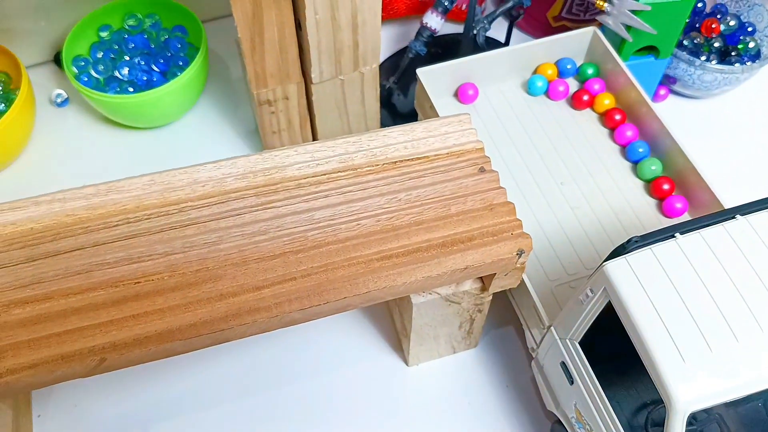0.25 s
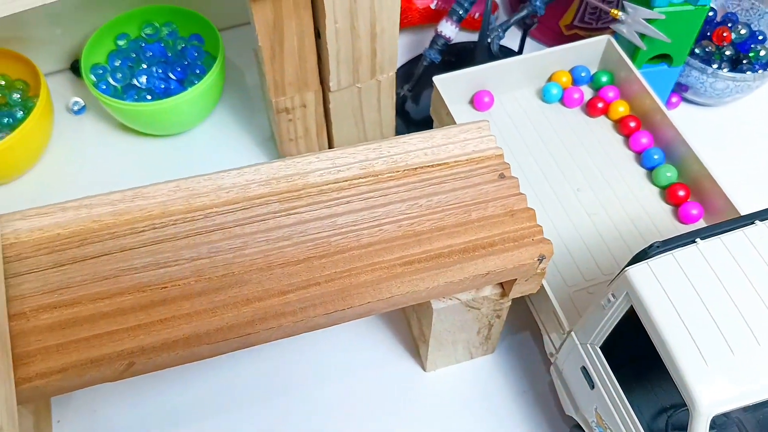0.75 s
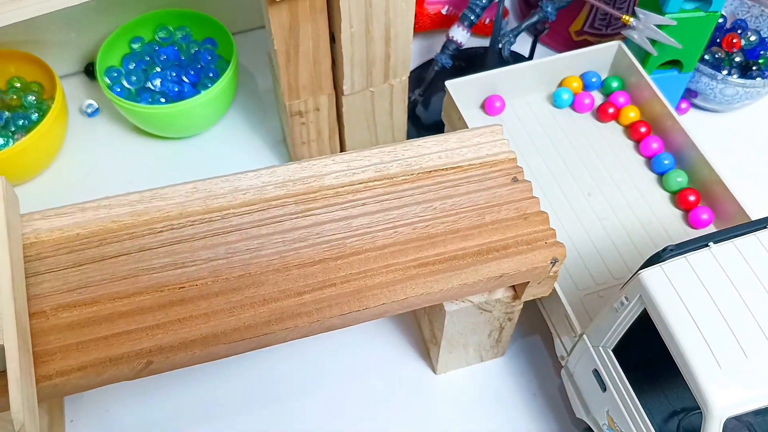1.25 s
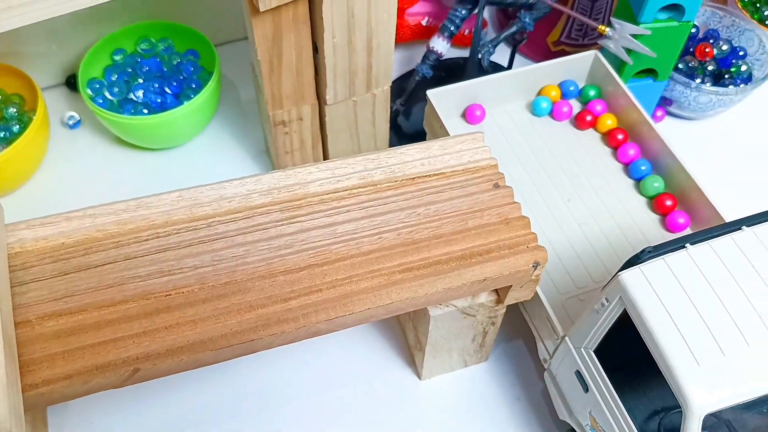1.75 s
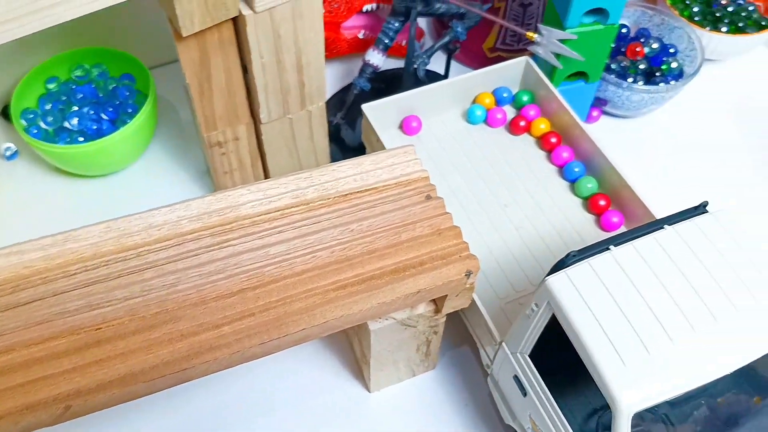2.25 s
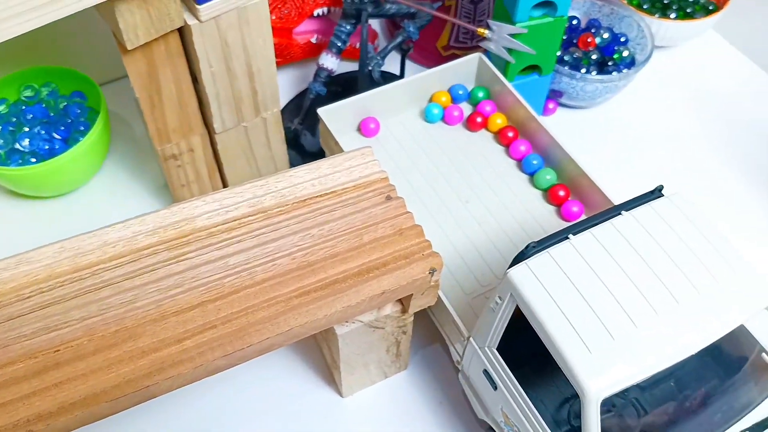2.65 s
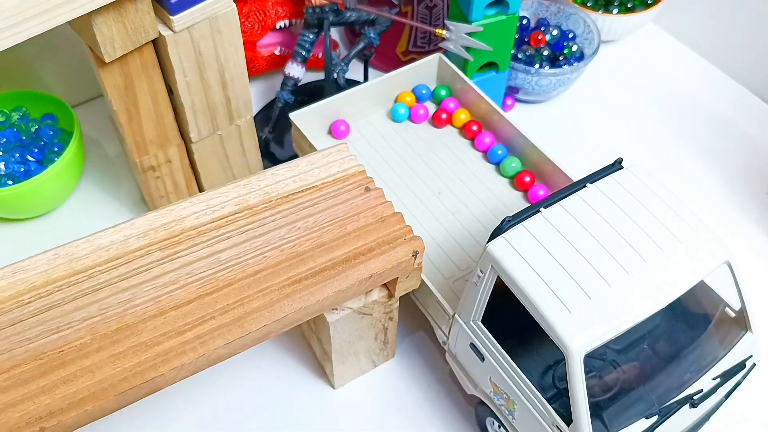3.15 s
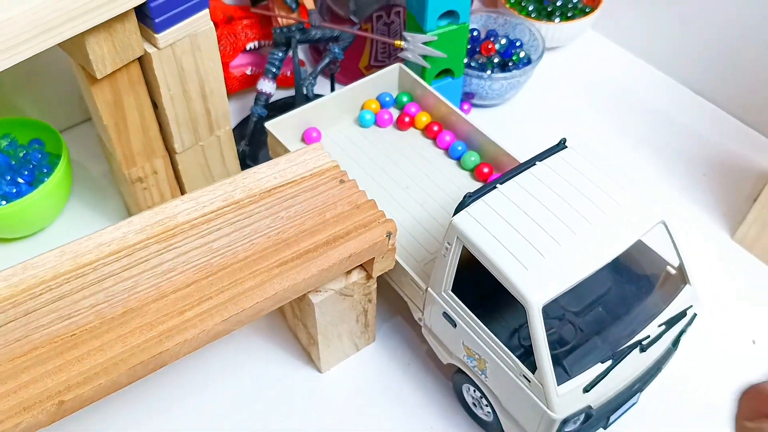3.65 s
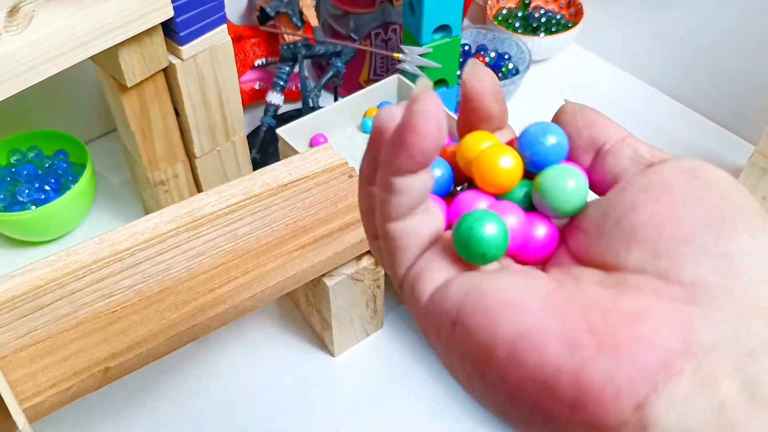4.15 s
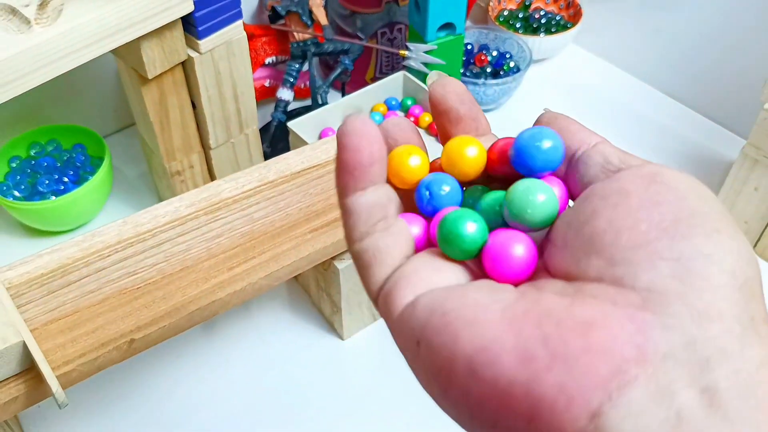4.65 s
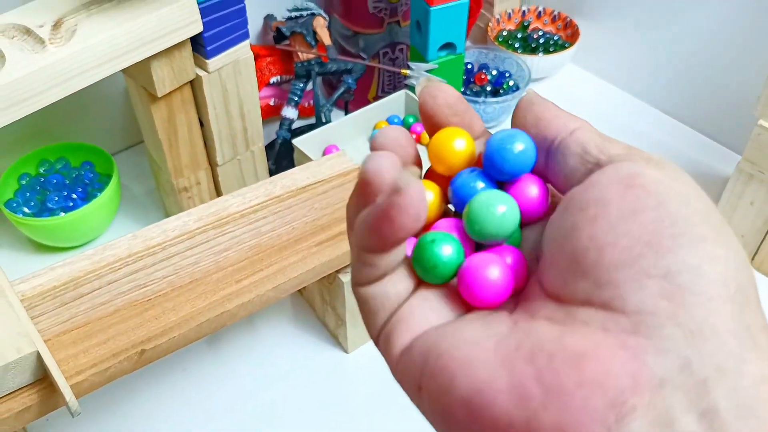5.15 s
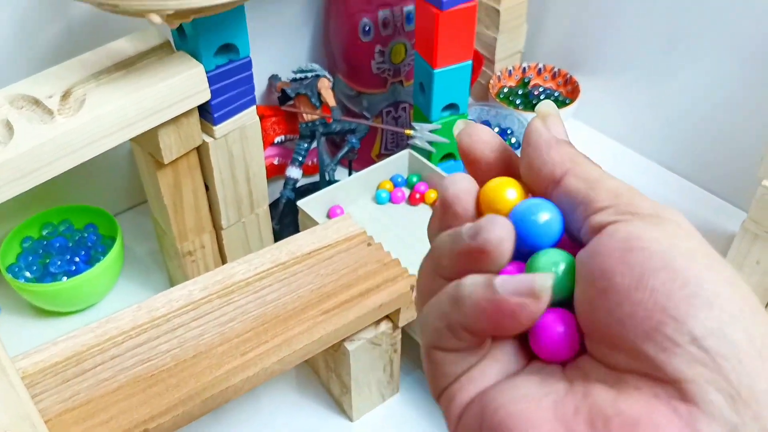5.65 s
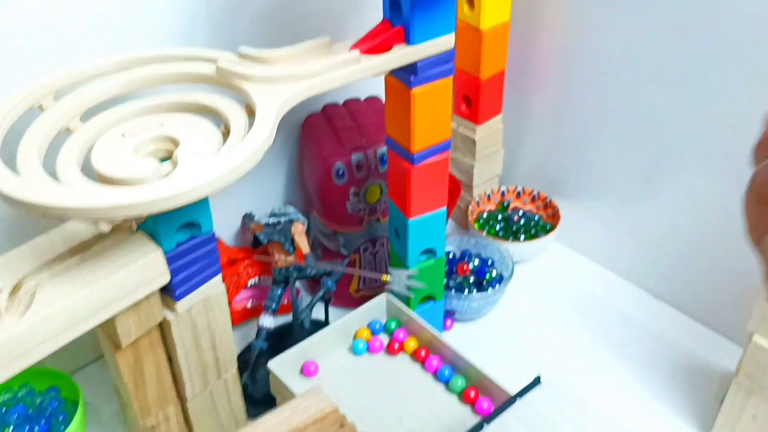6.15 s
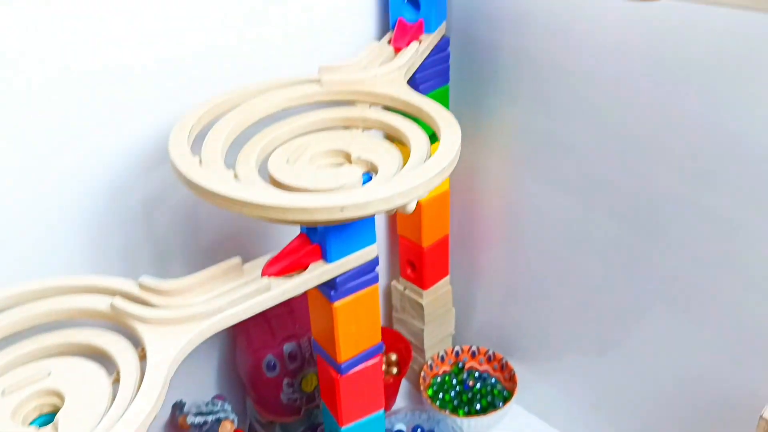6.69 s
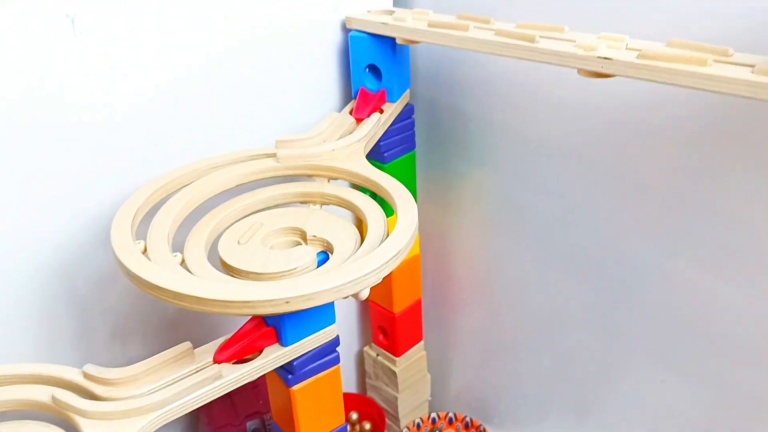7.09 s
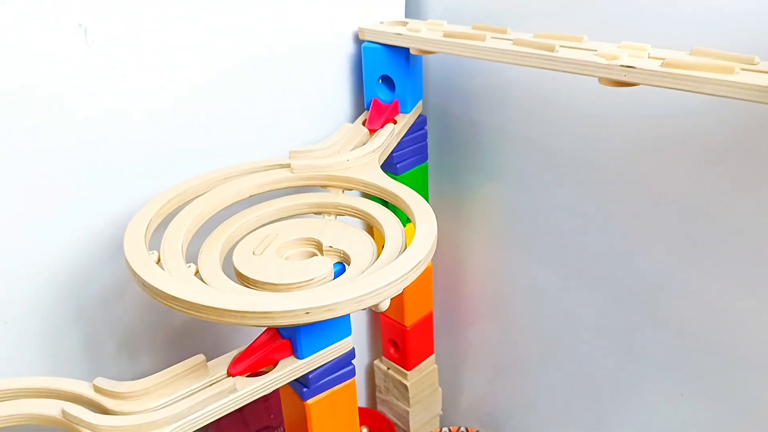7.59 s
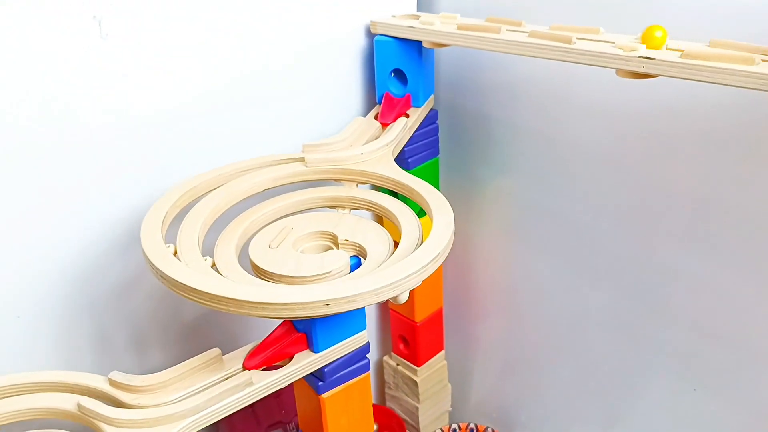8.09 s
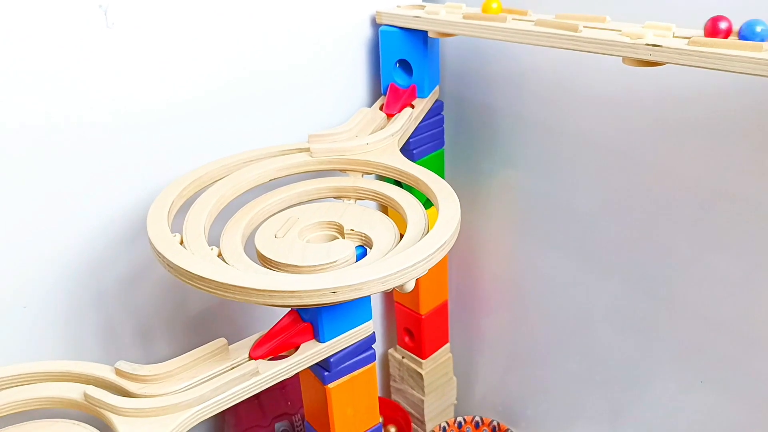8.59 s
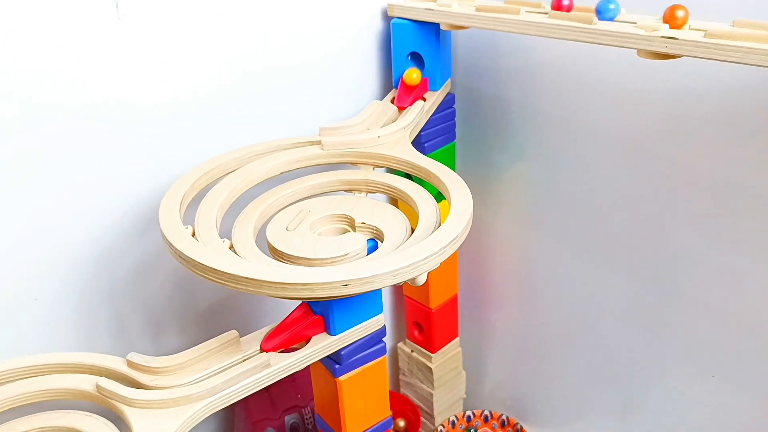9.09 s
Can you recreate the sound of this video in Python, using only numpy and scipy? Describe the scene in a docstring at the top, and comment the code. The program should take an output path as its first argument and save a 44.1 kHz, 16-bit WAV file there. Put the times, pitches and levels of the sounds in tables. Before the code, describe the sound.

Hard little balls rattle in a tub, two loud knocks ring out, soft palm clicks follow, then wooden clacks and rolling in a bare room.

```python
"""A hand stirs and scoops small hard balls in a plastic tub: short noise cracks and brief modal notes.
Two hollow knocks, on the tub and then a board, rebound and rattle: each object has its own damped modes.
The balls click in the palm on the way to a wooden marble run: bright cracks and a lower note of the cupped hand.
They drop one by one on its top rail, as clacks and panel thumps, and roll: dense tiny contacts over a rumble.
A bare room rings by decaying noise; filtered noise makes faint air and a low wavering hum underneath."""
import sys
import numpy as np
from scipy import signal
from scipy.fft import rfft, irfft, next_fast_len
from scipy.io import wavfile

SR = 44100
rng = np.random.default_rng(int(sys.argv[2]) if len(sys.argv) > 2 else 0)


def output_pcm(signal):
    """Save a mono or channel-first signal as 16-bit PCM at the path in sys.argv[1].

    Samples are clipped to [-1, 1] before scaling.
    """
    pcm = np.clip(np.atleast_2d(signal).T, -1, 1) * 32767
    wavfile.write(sys.argv[1], SR, np.round(pcm).astype(np.int16))


N = 411453
T = np.arange(N) / SR


def undb(db):
    """Logarithmic level: decibels to amplitude gain."""
    return 10 ** (np.asarray(db) / 20)


def lookup(points, hz):
    """Logarithmic pitch scale: interpolate (frequency_hz, value) points over log frequency."""
    f, value = np.transpose(points)
    return np.interp(np.log(np.maximum(hz, 1)), np.log(f), value)


def fade(t, t60):
    """Exponential damping: amplitude is 60 dB down at t60 seconds."""
    return np.exp(-np.log(1000) * t / t60)


def sides(db):
    """Level-difference stereo: left and right gains for left minus right in dB."""
    return undb(np.array([[db], [-db]]) / 2)


def tint(x, colour, shift=1, size=1024):
    """Minimum-phase filtering: a causal response of unit energy, its colour moved up in pitch by shift."""
    hz = np.arange(size // 2 + 1) * SR / size
    cepstrum = irfft(np.log(undb(lookup(colour, hz / shift))))
    # folding the cepstrum onto positive time makes the response causal
    cepstrum[1:size // 2] *= 2
    cepstrum[size // 2 + 1:] = 0
    h = irfft(np.exp(rfft(cepstrum)))
    return signal.fftconvolve(x, h[None] / np.linalg.norm(h), axes=1)[:, :x.shape[1]]


def ports(count, alike_hz=650):
    """Spatial coherence: noise at two microphones, alike in the bass and unrelated in the treble."""
    mid, side = rfft(rng.standard_normal((2, count)))
    hz = np.arange(len(mid)) * SR / count
    alike = 1 / (1 + (hz / alike_hz) ** 2)
    mid = mid * np.sqrt(1 + alike)
    side = side * np.sqrt(1 - alike)
    return irfft(np.array([mid + side, mid - side]), count) / np.sqrt(2)


def add(out, s, sound):
    """Superposition: mix a sound in at time s."""
    i = max(int(s * SR), 0)
    out[:, i:i + sound.shape[1]] += sound[:, :N - i]


def contact(colour, crack_s, echo_s, echo_db, rise_s=0.0041, shift=1, vary_db=7.0, size=4096, count=176):
    """Impulsive excitation: a crack of unit level over count samples, with sparse echoes off nearby things."""
    t = np.arange(size) / SR
    # no two contacts ring alike
    colour = np.array(colour) + np.array([0, vary_db]) * rng.standard_normal((len(colour), 1))
    crack = ports(size) * fade(t, crack_s) * (1 - fade(t, rise_s))
    polarity = rng.choice([-1, 0, 1], (2, size), p=[.06, .88, .06])  # most samples carry no echo
    arrivals = rng.standard_normal((2, size)) ** 2 * polarity
    echoes = arrivals * fade(t, echo_s) * (1 - fade(t, 0.032))
    crack, echoes = (tint(v, colour, shift) for v in (crack, echoes))
    crack, echoes = (v / np.linalg.norm(v, axis=1, keepdims=True) for v in (crack, echoes))
    return (crack + undb(echo_db) * echoes) * np.sqrt(count)


def ring(modes, spread_db=6.5, detune=0.0036, size=22050):
    """Modal superposition: damped sinusoids, weighted anew because each blow lands elsewhere."""
    hz, db, t60 = np.transpose(modes)[:, :, None]
    t = np.arange(size) / SR
    weight, tuning, lag = rng.standard_normal((3, len(hz), 1))
    envelope = undb(db + spread_db * weight) * fade(t, t60) * (1 - np.exp(-t * hz))
    waves = envelope * np.exp(2j * np.pi * hz * (1 + detune * tuning) * t)
    turn = np.exp(1j * lag * hz / 1200)  # short waves reach the two microphones out of step
    polarity = rng.choice([-1, 1], (len(hz), 1))
    return np.array([(waves * polarity * p).imag.sum(0) for p in (turn, turn.conj())])


def note(hz, t60):
    """Local resonance: a close pair of short-lived modes gives one contact its pitch."""
    return ring([(hz * .95, -3, t60), (hz, 0, t60)], spread_db=1, size=4096)


# every contact excites its own handful of modes: their decay, and their level relative to the crack
SPOT_T60_S, SPOT_DB = .055, -1.5


def spot(colour, t60=SPOT_T60_S, count=12, size=4096):
    """Selective modal excitation: a few modes drawn where the colour is strong, as loud as a unit crack."""
    grid = np.geomspace(colour[0][0], colour[-1][0], size)
    odds = undb(lookup(colour, grid)) ** 2 * np.sqrt(grid)
    chosen = rng.choice(grid, count, p=odds / odds.sum())
    x = ring([(hz, 0, t60) for hz in chosen], spread_db=2, size=size)
    return x * np.sqrt(2 * .004 * SR / np.sum(x ** 2))


BUMP_RISE_S = .05  # time for the swell to come within 60 dB of complete


def bump(hz, t60, size=11025):
    """Panel resonance: a soft push makes low modes around hz swell and die, at unit level over 20 ms."""
    x = ring([(hz * .8, -9, t60), (hz, 0, t60), (hz * 1.25, -9, t60)], spread_db=1, size=size)
    x = x * (1 - fade(np.arange(size) / SR, BUMP_RISE_S))
    return x * np.sqrt(2 * .02 * SR / np.sum(x ** 2))


def grains(length, colour, rate, spread_db, smear_s, size=1024):
    """Random impact process: tiny uneven decaying cracks, rate a second on average, at unit level."""
    count = max(int(length * SR), size)
    hits = (rng.random(count) < rate / SR) * undb(spread_db * np.clip(rng.standard_normal(count), -2, 2))
    power = signal.fftconvolve(hits ** 2, fade(np.arange(size) / SR, smear_s) ** 2)
    x = tint(ports(len(power)) * np.sqrt(np.abs(power)), colour)
    return x * np.sqrt(2 * count / (np.sum(x ** 2) + 1e-9))


def waver(rate):
    """Slow random modulation: drift through rate random points a second."""
    return np.interp(T * rate, np.arange(N // 1000), rng.standard_normal(N // 1000))


# how the tub and the board differ between left and right, by frequency: frequency_hz, left_minus_right_db
RIGHT_SIDE = [(200, -4), (1000, 0.5), (2300, -4.5), (4300, -7), (7800, -13.5), (10000, 0), (13000, -23.5)]


def aside(x):
    """Frequency-dependent balance: the tub's and the board's sounds lean right, unevenly across the spectrum."""
    size = next_fast_len(N + SR // 10)
    db = lookup(RIGHT_SIDE, np.arange(size // 2 + 1) * SR / size)
    return irfft(rfft(x, size) * undb(np.array([db, -db]) / 2), size)[:, :N]


# colour of the faint air noise: frequency_hz, relative_level_db
AIR = [(25, -18), (90, -7.5), (150, -9), (260, -2.5), (800, -3), (2600, -3), (5000, -19), (9000, -20.5),
       (16000, -32)]
AIR_DB = -62


def background():
    """Filtered noise: faint air, and a narrow low band that wavers as a hum."""
    air = tint(ports(N), AIR, size=4096)
    hum_band = [(60, -59), (80, -12.0), (91, 7.0), (102, -7.5), (125, -48.5), (400, -91.5)]
    hum = tint(ports(N, alike_hz=302.0), hum_band, size=16384)
    return undb(AIR_DB) * air + undb(-73.5 + 3.2 * waver(6.8)) * hum


# colour of ball against ball: frequency_hz, relative_level_db
CLICK = [(1200, -48.5), (4500, -5.5), (6500, -8.5), (7900, 6), (9800, 4.5), (11800, -10), (16000, -21.5)]
# colour of the tub's wall: frequency_hz, relative_level_db
TUB_WALL = [(45, -17.5), (110, -7), (200, -11), (380, -2), (550, -13), (760, 0.5), (950, -8), (1650, 2),
            (2200, -6), (2850, 0), (3700, -12.5), (4500, -12), (9000, -31.5)]
RAP_NOTE_DB, RAP_T60_S = 2.5, .035  # note of the spot struck, relative to the wall level


def collide(out, s, click_db, wall_db, hz):
    """Impact: one ball strikes its neighbours and the wall, which answers with the note of that spot."""
    add(out, s, undb(click_db) * contact(CLICK, crack_s=0.024, echo_s=0.12, echo_db=-0.5, vary_db=2))
    crack = contact(TUB_WALL, crack_s=0.018, echo_s=0.089, echo_db=-1.0, vary_db=2.5)
    add(out, s, undb(wall_db) * (crack / np.sqrt(2) + undb(SPOT_DB) * spot(TUB_WALL)))
    add(out, s, undb(wall_db + RAP_NOTE_DB) * note(hz, RAP_T60_S))


# balls tumbling in the tub: start_s, click_db, wall_db, spot_pitch_hz
TUMBLES = [(0.032, -28, -36, 2900), (0.1052, -38, -35.5, 1460), (0.2223, -36, -34.5, 3030),
           (0.2523, -21, -30, 1490), (0.349, -23, -34, 1480), (0.381, -23.5, -31.5, 4600),
           (0.493, -24, -26.5, 1810), (0.525, -22.5, -19, 2880), (0.565, -24, -28, 4400),
           (0.6012, -19.5, -22.5, 1750), (0.6247, -27.5, -17.5, 1736), (0.6661, -29, -22, 1670),
           (0.7214, -28.5, -29, 2645), (0.755, -31.5, -28.5, 2900), (0.7754, -48, -29, 2770),
           (1.047, -34, -30, 3280), (1.2124, -30.5, -50, 4440), (1.2286, -42, -29.5, 1770),
           (1.378, -26, -37, 4300), (1.412, -30.5, -35, 1460), (1.543, -24.5, -27, 1500),
           (1.5924, -31, -29.5, 1610), (1.665, -39, -23, 1766), (1.715, -36.5, -34, 1140),
           (1.795, -48, -26, 2610), (1.91, -24.5, -26, 3150), (2.1451, -37.5, -46.5, 4430),
           (2.358, -36.5, -49.5, 4460)]


def tumbles():
    """Discrete impacts: single balls click on each other and rap the wall."""
    out = np.zeros((2, N))
    for row in TUMBLES:
        collide(out, *row)
    return out


# balls bumping the tub's bottom, whose note shifts with place and load: start_s, level_db, pitch_hz
BUMPS = [(0.252, -38, 247), (0.397, -37, 403), (0.521, -28, 260), (0.566, -24, 252), (0.67, -33, 240),
         (1.123, -34.5, 330), (1.254, -37, 335), (1.55, -35.5, 333), (1.617, -28.5, 337), (1.661, -24, 332),
         (1.712, -30.5, 356), (1.796, -31.5, 244), (1.914, -27, 259), (1.96, -33, 263), (1.988, -28, 261)]
BUMP_T60_S = .06


def bumps():
    """Panel resonance: the tub's bottom answers each ball with a soft low note."""
    out = np.zeros((2, N))
    for s, db, hz in BUMPS:
        add(out, s, undb(db) * bump(hz, BUMP_T60_S))
    return out


# strokes of the hand through the heap: start_s, end_s, jostling_db, pressure_on_tub_db
STROKES = [(0.352, 0.403, -31, -40), (0.415, 0.476, -38, -41.5), (0.498, 0.681, -31.5, -31.5),
           (0.696, 0.78, -42, -42.5), (1.061, 1.146, -40, -36.5), (1.367, 1.421, -33.5, -37.5),
           (1.584, 1.735, -42, -32.5)]
COLLISIONS_PER_S, COLLISION_SPREAD_DB = 26, 3
COLLISION_DB, WALL_RAP_DB = -0.5, 3.5  # relative to the stroke's jostling and pressure


def strokes():
    """Granular flow: a stirred heap gives dense tiny contacts and randomly timed collisions."""
    out = np.zeros((2, N))
    spots = np.array(TUMBLES)[:, 3]
    for start, end, jostle_db, press_db in STROKES:
        length = end - start
        jostling = grains(length, CLICK, rate=130, spread_db=3, smear_s=0.014)
        pressing = grains(length, TUB_WALL, rate=370, spread_db=0.5, smear_s=0.022)
        add(out, start, undb(jostle_db) * jostling)
        add(out, start, undb(press_db) * pressing)
        count = max(round(length * COLLISIONS_PER_S), 1)
        for k, (when, click, rap) in enumerate(rng.random((count, 3))):
            s = start + length * (k + when) / count
            click_db = jostle_db + COLLISION_DB + COLLISION_SPREAD_DB * (2 * click - 1)
            wall_db = press_db + WALL_RAP_DB + COLLISION_SPREAD_DB * (2 * rap - 1)
            collide(out, s, click_db, wall_db, rng.choice(spots))
    return out


def scoop():
    """Superposition: tumbling, bumping and stirring add up in the tub on the right."""
    return aside(tumbles() + bumps() + strokes())


# the room's ring: frequency_hz, t60_s
ROOM_T60 = [(100, 0.87), (280, 1.41), (500, 1.72), (1200, 1.66), (2500, 1.48), (7000, 0.73), (15000, 0.57)]


def room(x, size=52920):
    """Diffuse reverberation: noise bands decay between bare walls, fastest in the treble."""
    t = np.arange(size) / SR
    noise = rfft(ports(size))
    hz = np.arange(noise.shape[1]) * SR / size
    centres_hz = np.array(ROOM_T60)[:, 0]
    tail = 0
    for share, (_, t60) in zip(np.eye(len(ROOM_T60)), ROOM_T60):
        band = lookup(np.column_stack([centres_hz, share]), hz)  # overlapping bands that sum to one
        tail = tail + irfft(noise * band, size) * fade(t, t60)
    tail = tail * (1 - fade(t, 0.0079))  # the first wall echoes take a moment to arrive
    mono = x.sum(0, keepdims=True) / np.sqrt(2)
    return signal.fftconvolve(mono, tail / np.linalg.norm(tail[0]), axes=1)[:, :N]


# hollow knocks and their rebounds: start_s, body_db, sharp_edge_db, object_struck
KNOCKS = [(2.478, -15, -19.5, "tub"), (2.496, -10.5, -30, "tub"), (2.612, -22.5, -29, "tub"),
          (2.697, -28, -39, "tub"), (2.781, -30.5, -46.5, "tub"), (2.9025, -10.5, -24, "board"),
          (3.017, -24, -30, "board")]
# colour of each struck body, by object: frequency_hz, relative_level_db
KNOCK_BODY = {"tub": [(150, -17), (350, -3), (560, -6), (770, 5), (1050, -2), (1500, 5), (2050, -8),
              (2950, -4), (3900, -16), (9000, -32)], "board": [(270, -25), (440, -1), (1750, -3),
              (2060, -11.5), (2600, -3.5), (3900, -13.5), (9000, -44.5)]}
# ringing modes, by object: frequency_hz, relative_level_db, t60_s
KNOCK_MODES = {"tub": [(392.6, 0, .4), (768, 5, .5), (1450, -1, .5), (1750, 0, .5)],
               "board": [(466, 1, 0.45), (523, -1, 0.35), (637, -1, 0.35), (1160, 0, 0.45),
               (1802, -1, 0.55)]}
KNOCK_RING_DB = -20  # relative to the body level


def blows():
    """Modal response: the tub, then a hollow board, takes a hard knock and rebounds, ringing with its modes."""
    out = np.zeros((2, N))
    for s, body_db, edge_db, what in KNOCKS:
        crack = contact(KNOCK_BODY[what], crack_s=0.03, echo_s=0.16, echo_db=-9.5, vary_db=1)
        body = (crack + undb(SPOT_DB) * spot(KNOCK_BODY[what])) / np.sqrt(2)
        add(out, s, undb(body_db) * body)
        add(out, s, undb(body_db + KNOCK_RING_DB) * ring(KNOCK_MODES[what], spread_db=1, detune=.003))
        add(out, s, undb(edge_db) * contact(CLICK, crack_s=0.024, echo_s=0.023, echo_db=-5))
    return out


# low thuds under the tub's knock: start_s, level_db
THUDS = [(2.478, -33), (2.553, -29.5)]
# modes of each thud: frequency_hz, relative_level_db, t60_s
THUD_MODES = [(86.8, -5.5, 0.37), (143, -3, 0.12), (260, -2.5, 0.16)]


def thuds():
    """Low-frequency modal response: the knock on the tub brings two deep thuds of three modes."""
    out = np.zeros((2, N))
    for s, db in THUDS:
        add(out, s, undb(db) * ring(THUD_MODES, spread_db=2))
    return out


# rattling after a hard knock: start_s, length_s, level_db, object_rattling
RATTLES = [(2.505, 0.068, -24, "tub"), (2.914, 0.11, -23, "board")]
RATTLE_T60_S = 0.64


def rattles():
    """Repeated impact: random contacts with the colour of the struck body die away exponentially."""
    out = np.zeros((2, N))
    for s, length, db, what in RATTLES:
        rattle = grains(length, KNOCK_BODY[what], rate=300, spread_db=3, smear_s=0.02)
        decay = fade(np.arange(rattle.shape[1]) / SR, RATTLE_T60_S)
        add(out, s, undb(db) * rattle * decay)
    return out


def knocks():
    """Superposition: blows, thuds and rattles add up on the right."""
    return aside(blows() + thuds() + rattles())


# where the hand is: time_s, left_minus_right_db
HAND_PATH = [(3.75, -5.5), (4.75, 11), (5.5, 6), (6.05, 4)]


def hand_sides(s):
    """Level-difference stereo: gains that follow the hand's path."""
    return sides(np.interp(s, *np.transpose(HAND_PATH)))


# balls meeting in the palm: start_s, click_db, click_pitch_hz, cupped_hand_pitch_hz
PALM = [(3.7682, -44, 8200, 3085), (3.784, -29.5, 8960, 5300), (4.1133, -32, 8700, 3100),
        (4.129, -44, 8450, 4300), (4.2285, -34.5, 9000, 3720), (4.359, -41.5, 8300, 3880),
        (4.488, -45.5, 8700, 3970), (4.711, -40, 8940, 3500), (4.759, -34.5, 9300, 4360),
        (4.789, -38.5, 9200, 4100), (4.801, -38.5, 9500, 4200), (4.8778, -32.5, 9300, 5620),
        (5.051, -33.5, 9200, 3580), (5.0686, -37, 8900, 4040), (5.3514, -37.5, 9000, 4250),
        (5.399, -37, 9400, 4430), (5.482, -45, 9400, 3150), (5.6104, -39, 9200, 4820),
        (5.628, -33.5, 9250, 4750), (5.7102, -37.5, 9100, 3360), (5.9215, -38.5, 8700, 2970),
        (6.0022, -42, 8200, 5260), (6.031, -42.5, 8200, 5570), (6.305, -41.5, 8540, 5320)]
# colour of the click: frequency_hz, relative_level_db
PALM_CLICK = [(2000, -51), (6800, -14.5), (8000, 0.5), (10000, 1), (11500, -13.5), (16000, -33)]
# colour of the cupped hand: frequency_hz, relative_level_db
PALM_HOLLOW = [(1200, -30), (2500, -9), (3200, -0.5), (4200, -1.5), (5200, -2.5), (6500, -9.5),
               (10000, -16)]
HOLLOW_DB, PALM_NOTE_DB = -7, 0.5  # the hand's modes and its note, relative to each click
PALM_T60_S = .013
SETTLING_DB = -65  # faint stray ticks while the balls are carried


def palm_clicks():
    """Cavity resonance: ball on ball clicks brightly and the cupped hand answers with a lower note."""
    out = np.zeros((2, N))
    add(out, 3.3, undb(SETTLING_DB) * grains(3, PALM_CLICK, rate=12, spread_db=5.5, smear_s=0.019))
    for s, db, hz, hand_hz in PALM:
        click = contact(PALM_CLICK, crack_s=0.0045, rise_s=0.0003, echo_s=0.085, echo_db=-1,
                        shift=hz / 9000, vary_db=3)
        hollow = undb(HOLLOW_DB) * spot(PALM_HOLLOW, PALM_T60_S)
        hand_note = undb(PALM_NOTE_DB) * note(hand_hz, PALM_T60_S)
        add(out, s, undb(db) * hand_sides(s) * (click + hollow + hand_note))
    return out


# the fingers shift their grip: start_s, end_s, muffled_ticks_db
GRIPS = [(4.717, 4.91, -54), (5.32, 5.51, -50.5), (5.89, 6.05, -55)]
# colour of rubbing skin: frequency_hz, relative_level_db
SKIN = [(200, -10), (1500, 0), (7000, -30)]
SKIN_DB = -6  # relative to the ticks


def grips():
    """Friction noise: shifting fingers add muffled ticks and a rub of skin."""
    out = np.zeros((2, N))
    for start, end, db in GRIPS:
        ticks = grains(end - start, PALM_HOLLOW, rate=220, spread_db=3, smear_s=0.022)
        skin = tint(ports(ticks.shape[1]), SKIN)
        swell = signal.windows.tukey(ticks.shape[1])
        add(out, start, undb(db) * swell * (hand_sides(start) * ticks + undb(SKIN_DB) * skin))
    return out


def palm():
    """Superposition: clicks and shifting fingers add up in the hand."""
    return palm_clicks() + grips()


# balls landing and bumping on the rail: start_s, level_db, clack_pitch_hz, thump_pitch_hz
RAIL = [(7.478, -28, 2420, 385), (7.588, -27, 2370, 450), (7.648, -23.5, 2400, 437),
        (7.693, -23, 3210, 447), (7.8059, -23, 2230, 470), (7.822, -21.5, 2390, 293),
        (8.009, -38, 2510, 306), (8.1083, -24.5, 2246, 277), (8.175, -32.5, 2260, 319),
        (8.2869, -39, 2440, 338.5), (8.4358, -23.5, 2233, 472), (8.691, -61, 2300, 255),
        (8.829, -44, 4000, 260), (8.8719, -35.5, 2260, 292), (8.9306, -31.5, 2460, 250),
        (8.9521, -23, 3050, 258), (8.993, -23, 3300, 513), (9.0084, -24.5, 3150, 270),
        (9.0409, -23.5, 1753, 298), (9.211, -25, 2600, 245)]
# colour of the clack: frequency_hz, relative_level_db
RAIL_CLACK = [(170, -27.5), (450, -4.5), (750, -13.5), (1250, -4.5), (1750, -3), (2300, 2), (3400, 1),
              (4300, -7), (10000, -25)]
RAIL_NOTE_DB, RAIL_T60_S = -2, 0.073  # note of the spot struck, relative to the clack
# thump of the rail relative to the clack; damped as the rail fills with balls
RAIL_BODY_DB, LOADING_DB_PER_S, RAIL_THUMP_T60_S = -17, -3, 0.14
# the ball's own click grows more slowly than the clack (growth in dB per dB)
FIRM_CLACK_DB, FIRM_CLICK_DB, CLICK_GROWTH = -24.5, -33.5, 0.78


def clacks():
    """Impact on a wooden beam: a clack with its note, the ball's own click and a low thump."""
    out = np.zeros((2, N))
    for s, db, hz, thump_hz in RAIL:
        body_db = db + RAIL_BODY_DB + LOADING_DB_PER_S * (s - RAIL[0][0])
        click_db = FIRM_CLICK_DB + CLICK_GROWTH * (db - FIRM_CLACK_DB)
        clack = contact(RAIL_CLACK, crack_s=0.05, echo_s=0.22, echo_db=-1.0,
                        shift=np.sqrt(hz / 2500), vary_db=0.5)
        click = contact(CLICK, crack_s=0.05, echo_s=0.34, echo_db=-4.0)
        add(out, s, undb(db) * (clack / np.sqrt(2) + undb(SPOT_DB) * spot(RAIL_CLACK)))
        add(out, s, undb(db + RAIL_NOTE_DB) * note(hz, RAIL_T60_S))
        add(out, s, undb(click_db) * sides(-2.6) * click)
        add(out, s, undb(body_db) * bump(thump_hz, RAIL_THUMP_T60_S))
    return out


# loudness of rolling along the rail: time_s, level_db
ROLL = [(7.52, -58), (7.65, -37), (7.95, -56), (8.35, -52), (8.66, -57), (8.72, -49), (8.8, -61.5),
        (9.08, -33.5), (9.2, -54), (9.33, -38)]
# colour of the rolling contacts: frequency_hz, relative_level_db
ROLLING = [(120, -7), (260, 13), (750, -5), (2400, 15.5), (12000, -28.5)]
# colour of the shaken frame: frequency_hz, relative_level_db
RUMBLE = [(45, -39), (85, 17), (130, 5), (300, -37)]
RUMBLE_DB = -18.5  # relative to the rolling


def rolling():
    """Rolling contact: balls meet the wood's grain in many tiny impacts and shake the frame."""
    s, db = np.transpose(ROLL)
    # the last level holds for 0.1 s
    level = undb(np.interp(T, s, db)) * (T >= s[0]) * (T <= s[-1] + .1)
    grain = grains(N / SR, ROLLING, rate=500, spread_db=5, smear_s=0.01)[:, :N]
    rumble = tint(ports(N), RUMBLE, size=4096)
    return level * (grain + undb(RUMBLE_DB) * rumble)


def rail():
    """Superposition: landings and rolling add up on the wooden rail."""
    return clacks() + rolling()


def scene():
    """Direct and reverberant sound: the nearer a source, the less of it returns from the room."""
    tub, board, hand, run = scoop(), knocks(), palm(), rail()
    walls = room(undb(-6.5) * tub + undb(-8.0) * board + undb(-9.0) * hand + undb(-10.0) * run)
    wall_colour = [(100, 7.0), (400, 0.66), (1500, 5.46), (3000, 2.8), (6000, 3.9), (9000, 4.4), (16000, 5.8)]
    return tub + board + hand + run + tint(walls, wall_colour) + background()


TOP_HZ = 16300  # upper edge of the passband


def record(dry):
    """Band limiting and saturation: thin the deep bass, round the highest peaks and cut the top."""
    thin = signal.sosfilt(signal.butter(2, 55, "high", fs=SR, output="sos"), dry)
    rounded = np.tanh(thin)
    return signal.sosfilt(signal.ellip(10, .2, 70, TOP_HZ, fs=SR, output="sos"), rounded)


dry = scene()
out = record(dry)
output_pcm(out)
```